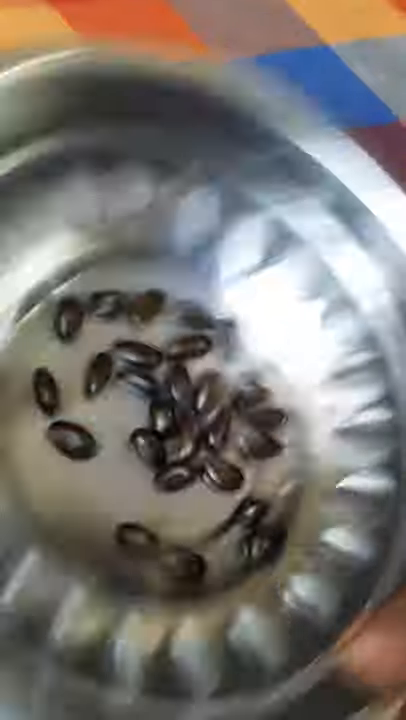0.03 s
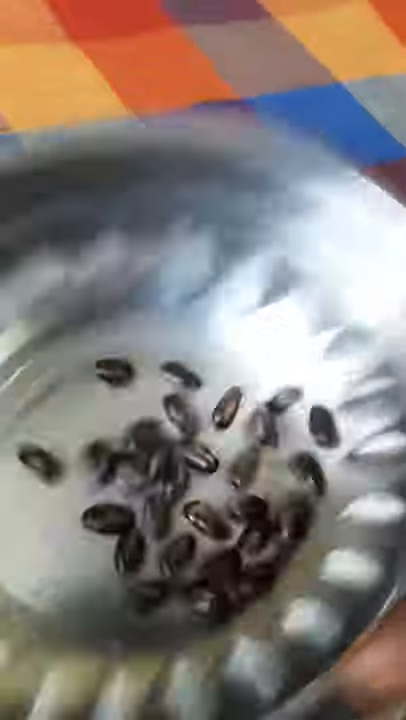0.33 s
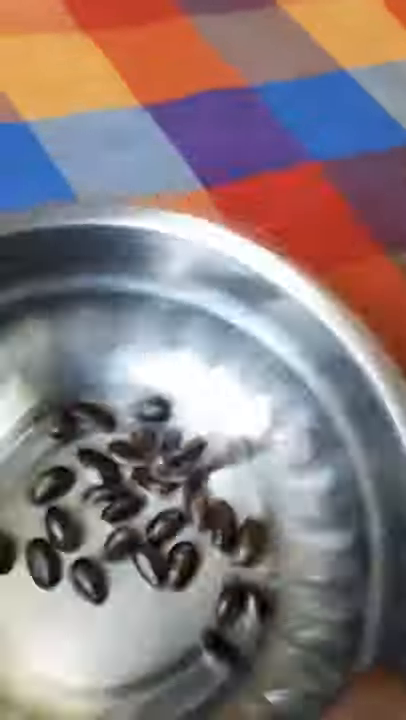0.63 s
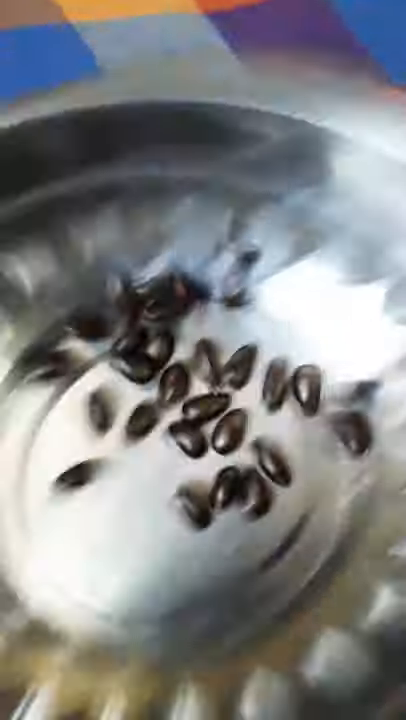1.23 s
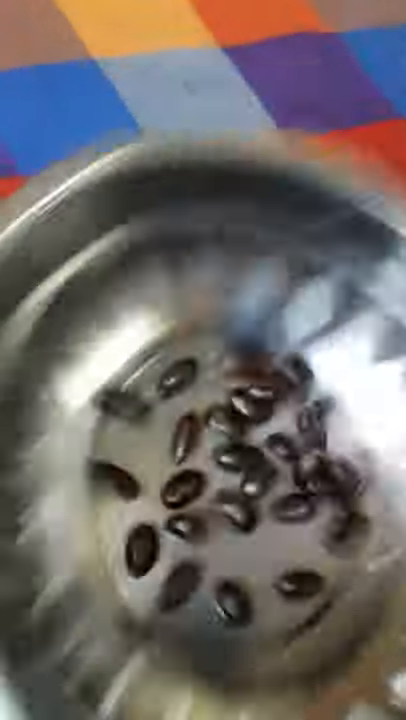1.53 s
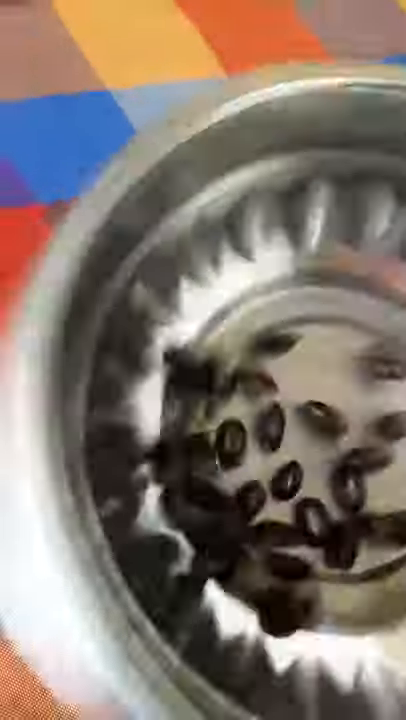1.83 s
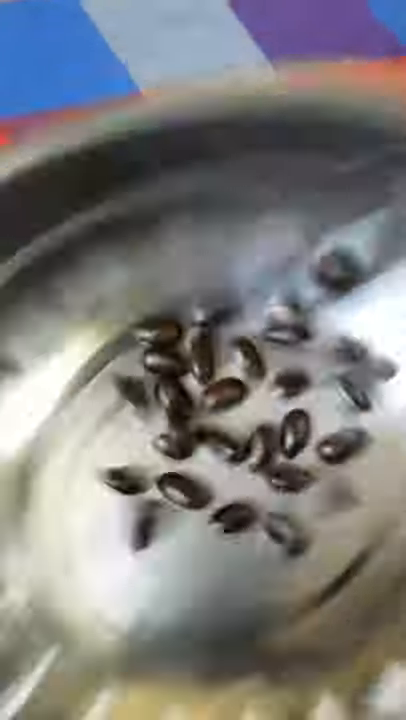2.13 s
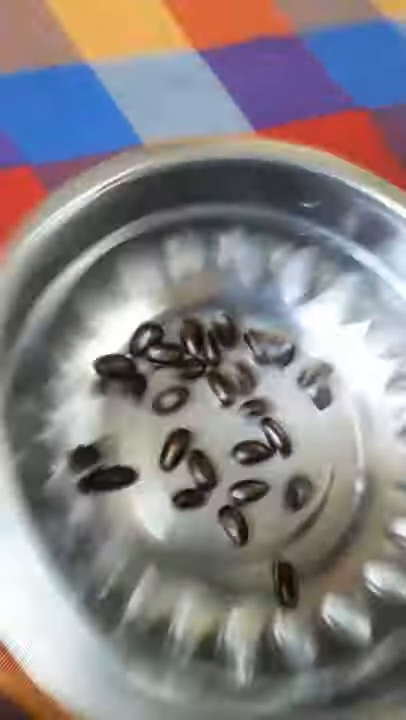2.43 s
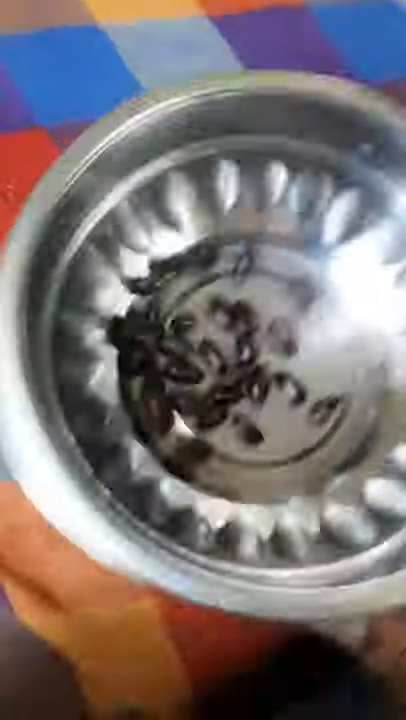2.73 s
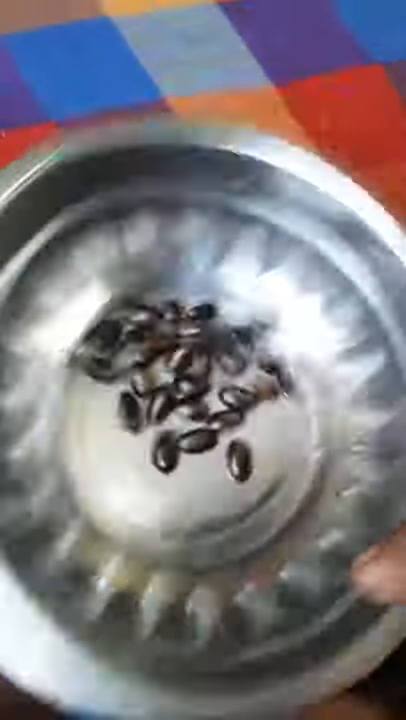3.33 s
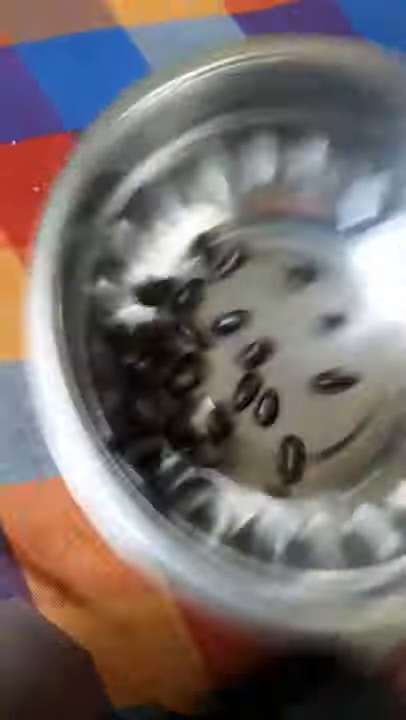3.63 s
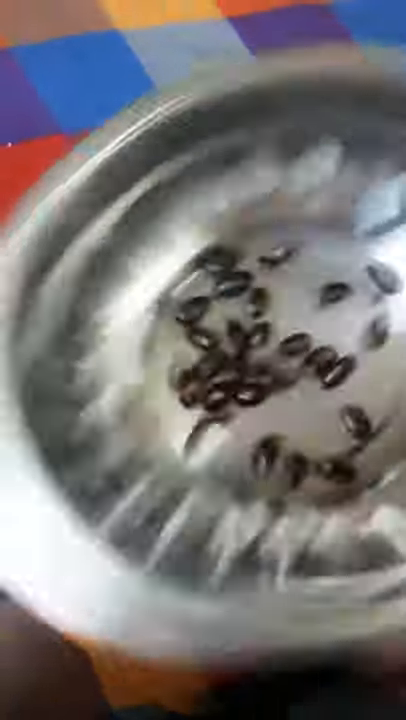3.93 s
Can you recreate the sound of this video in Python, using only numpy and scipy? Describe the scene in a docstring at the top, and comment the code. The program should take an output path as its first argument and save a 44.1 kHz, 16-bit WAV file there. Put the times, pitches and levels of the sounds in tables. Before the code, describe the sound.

Seeds swirl and clatter in a thin metal bowl with bright, ringing pings.

```python
"""A thin steel bowl rings as a few dozen hard seeds are shaken round it, heard from close by.
The seeds slide and skitter over the bottom and surge against the fluted wall. Each impact excites the
bowl's normal modes, in a mix that depends on the spot struck, over a short clatter and a crack.
Single hard hits ping out of the rattle, and a faint low hum comes and goes near the end."""
import sys
import numpy as np
from scipy import signal
from scipy.fft import rfft, irfft, next_fast_len
from scipy.io import wavfile
from scipy.ndimage import uniform_filter1d

SR = 44100
rng = np.random.default_rng(int(sys.argv[2]) if len(sys.argv) > 2 else 0)


def inscribe(sig):
    """Save sig as 16-bit PCM at rate SR to the path in sys.argv[1].

    A 1-D sig is mono; a 2-D sig holds one channel per row.
    Samples are clipped to [-1, 1] before scaling.
    """
    pcm = np.round(np.clip(np.atleast_2d(sig).T, -1, 1) * 32767)
    wavfile.write(sys.argv[1], SR, pcm.astype(np.int16))


N = 176400

# Normal modes of the bowl: frequency_hz, energy_share_db
BOWL_MODES = [(1620, -32.6), (2385, -19.3), (2515, -23.2), (2672, -24.7), (2755, -27.5), (3211, -15.8),
              (3250, -19.5), (3428, -16), (3452, -18), (3617, -26), (3895, -27.1), (4170, -19.7),
              (4252, -14.4), (4315, -14.1), (4405, -16), (4670, -22.0), (4811, -16), (5048, -22.5),
              (5238, -19.6), (5367, -22.5), (5712, -21), (6130, -19.2), (6392, -15.8), (6503, -20.1),
              (6678, -19.9), (6800, -21.8), (7046, -18.0), (7100, -17.2), (7185, -19.1), (7410, -20.7),
              (7500, -18.4), (7590, -14), (7688, -12.5), (8292, -16.2), (8400, -16.6), (8740, -22.4),
              (9157, -21.5), (9430, -18.5), (10444, -26.3), (10780, -24.5), (11466, -18.0), (12110, -21.3),
              (12700, -24), (13500, -21.7), (14690, -27.9), (15420, -28.6)]
# Spectrum of the seeds' clatter and the many weak modes: frequency_hz, relative_density_db
CLATTER_SPECTRUM = [(90, -67.5), (165, -63.5), (225, -57.5), (305, -59), (360, -61.5), (560, -63),
                    (640, -47), (1020, -47), (1130, -53.5), (1520, -54.5), (1900, -44.5), (2150, -51.5),
                    (2550, -39.5), (2950, -57), (3350, -40.5), (3780, -50), (4200, -37), (4750, -40),
                    (5020, -59), (5950, -46), (6400, -38.5), (7600, -33), (8500, -46.5), (9450, -45),
                    (9900, -56), (10700, -53), (13300, -52), (13900, -63), (15700, -47.5)]
# Seeds skittering on the bottom: time_s, level_db, gain_below_5500_hz_db, gain_above_9050_hz_db
SKITTER_LEVELS = [(0.07, -25.5, 9.5, 4), (0.14, -20, -0.5, -7), (0.3, -22.5, 4, 1.8), (0.45, -19, 3, -2),
                  (0.72, -20.5, 3, -0.5), (0.78, -22.5, 3.5, -2.5), (0.9, -18, 2, -2.5),
                  (1.1, -19.5, 2, 5.5), (1.2, -18.5, 3.5, 3.5), (1.31, -17, 0.5, 5.5),
                  (1.4, -15, -1.5, -17), (1.46, -16.5, 2, -9.5), (1.62, -13.5, -1.9, -7),
                  (1.77, -19.5, -1, 5), (1.89, -23.5, -0.5, -2.5), (2.0, -19.5, 1, 3), (2.12, -23, 1.5, 0),
                  (2.25, -19.5, -0.5, 3), (2.45, -22.5, -0.5, -4), (2.55, -23, -1, -1.3),
                  (2.68, -21, -0.5, 2.5), (2.77, -24.5, -1.1, -7), (2.9, -22, -2.5, -1.5),
                  (3.15, -20, 1.1, -0.5), (3.26, -21.5, -0.5, -1), (3.49, -18, -1.5, -2),
                  (3.64, -12.5, -2, -2), (3.705, -18.5, -1.5, -3), (3.8, -13.7, -1, 3.5),
                  (4.0, -16.5, -3, -4)]
# Two bright groups of modes against their neighbours: time_s, gain_3000_3750_hz_db, gain_3750_5500_hz_db
MODE_GROUP_GAINS = [(.1, 0.5, -2), (.3, 1, 0), (.75, 4, -2.5), (.88, 2.5, -0.5), (1.3, -0.5, .5),
                    (1.53, -1.5, 2), (1.85, -5, -0.5), (2.18, 1.5, .5), (2.31, -3.5, 3), (2.5, -4, -1.5),
                    (3.1, -4, -1), (3.56, -4.5, -2), (3.8, -2, -4), (3.95, -3, 0.5)]
# Bunches of seeds running into the wall: start_s, rise_s, level_db, extra_treble_db
WALL_SURGES = [(0.152, 0.022, -15.5, 6.5), (0.19, 0.01, -14.5, -6), (0.24, 0.023, -15, -0.5),
               (0.362, 0.0091, -20.5, 5.5), (0.477, 0.0019, -16, -4), (0.508, 0.0055, -15, -1),
               (0.597, 0.003, -15.5, 5.5), (0.629, 0.007, -16.5, 0), (0.703, 0.0093, -14.5, 1.5),
               (0.818, 0.0083, -14, 7), (0.839, 0.0076, -11.5, 3), (0.9, 0.015, -15, -5),
               (0.953, 0.0059, -14, 5), (1.037, 0.015, -18.5, 2.5), (1.121, 0.014, -15.5, 3),
               (1.251, 0.0066, -12, 1), (1.326, 0.025, -11.5, 9.5), (1.468, 0.014, -11.5, 8),
               (1.509, 0.017, -13.5, 6), (1.574, 0.0098, -13.5, 2), (1.611, 0.0066, -15.5, 9),
               (1.68, 0.013, -12.5, 1), (1.695, 0.007, -13, 3.5), (1.733, 0.0032, -11, 2.5),
               (1.792, 0.011, -15.5, 2.5), (1.915, 0.016, -14.5, 2), (2.039, 0.0055, -14.5, -8),
               (2.073, 0.0015, -16, 1), (2.153, 0.014, -18, 6), (2.282, 0.005, -16, 2),
               (2.309, 0.0057, -15.5, 4), (2.39, 0.023, -18, 5.5), (2.58, 0.015, -20, -3),
               (2.785, 0.015, -22.5, 6), (2.843, 0.012, -17.5, 5), (2.924, 0.012, -17.5, -7),
               (2.973, 0.0069, -19.5, 3), (3.066, 0.015, -16.5, 1), (3.183, 0.0093, -15.5, -1),
               (3.264, 0.03, -15.5, -2), (3.389, 0.0023, -11, 8), (3.423, 0.0039, -10.5, 1),
               (3.512, 0.012, -16.5, -4), (3.552, 0.0064, -11.5, 4.5), (3.752, 0.0075, -10, -1),
               (3.865, 0.011, -12, -11), (3.974, 0.02, -11.5, 3)]
# Single hard hits, each favouring one group of modes: start_s, level_db, centre_hz, bandwidth_hz
HARD_HITS = [(.0703, -18, 6000, 6000), (.683, -14, 3420, 300), (1.176, -16, 4750, 600),
             (1.288, -21, 11500, 4000), (1.338, -19, 12000, 2400), (1.399, -13, 4650, 450),
             (1.58, -12, 7000, 3000), (1.86, -22, 4650, 450), (2.796, -24, 4400, 300),
             (3.036, -15.5, 7500, 5000), (3.556, -12, 7000, 1600), (3.651, -16, 4450, 500),
             (3.725, -14, 9000, 4500)]

START_S, RATTLE_DB = .069, 1
RING_DB, CLATTER_DB, CRACK_DB = -1.3, -5.5, -9
RING_T60_S, RING_T60_SLOPE = 0.16, 0.45  # ring time at 3 kHz; higher modes die sooner
CLATTER_T60_S, CRACK_T60_S = .08, .011
RADIATES_ABOVE_HZ = 470  # the small bowl gives off little bass
SPOT_SPREAD_DB = 6.5  # scatter of a mode's strength from spot to spot
CLUSTER_HZ = 41.3  # scatter of tuning at 10 kHz; the high modes come in close groups
IMPACTS_PER_S, IMPACT_SPREAD_DB, SHARING_S = 620, 6.5, .018
BOUNCE_S, BOUNCE_KEEP = .0009, 0.76  # a tumbling seed touches again at once, more weakly
SLIDE_SHARE, SLIDE_SMOOTH_S = .45, .05  # sliding's share of the lowest register's power; its smoothing
REGISTER_EDGES_HZ = (1150, 3000, 3750, 5500, 9050)
ROAM_SPOTS_PER_S, HEAP_SPOTS = 16, 2.2  # the heap travels round the bowl and covers a few spots
PING_S = .012  # a ping has the energy of its level held this long
PING_CRACK_DB, PING_CRACK_T60_S = -6, .014
PING_BOUNCE_CYCLES = 2.4  # gap times bandwidth: square hits are broad and sharp, glancing ones drawn out
HUM_HZ, HUM_DB, HUM_FROM_S, HUM_TO_S = 124, -61, 3.0, 3.75
LOW_CUT_HZ, TOP_HZ = 85, 15620


def undb(db):
    """Decibels as an amplitude ratio."""
    return 10 ** (np.asarray(db) / 20)


def unit_energy(x):
    """Normalisation to an energy of 1."""
    return x / np.sqrt(np.sum(x ** 2))


def decay(t, t60):
    """Exponential damping, 60 dB down after t60."""
    return np.exp(-np.log(1000) * t / t60)


def clatter(t, t60):
    """Modal overlap: many weak modes merge into damped noise; minimum phase keeps its onset sharp."""
    hz, db = np.array(CLATTER_SPECTRUM).T
    f = np.fft.rfftfreq(len(t), 1 / SR)
    magnitude = undb(np.interp(np.log(f + 1), np.log(hz), db))
    cepstrum = irfft(np.log(magnitude), len(t))
    colour = np.exp(rfft(2 * cepstrum * (t > 0) * (t < t[-1] / 2)))
    noise = rng.standard_normal(len(t)) * decay(t, t60)
    return unit_energy(irfft(rfft(noise) * colour, len(t)))


def bowl_responses(count, size):
    """Modal superposition: each spot struck gives its own mix of damped sines, plus clatter and crack."""
    t = np.arange(size) / SR
    hz, db = np.array(BOWL_MODES).T
    ring_times = RING_T60_S * (3000 / hz) ** RING_T60_SLOPE
    envelopes = np.array([np.sqrt(2) * unit_energy(decay(t, t60)) for t60 in ring_times])
    signs = rng.choice([-1, 1], (count, len(hz)))
    shapes = signs * undb(SPOT_SPREAD_DB * rng.standard_normal(signs.shape))
    gains = undb(db) * shapes / np.sqrt(np.mean(shapes ** 2, axis=0))
    tunings = hz + CLUSTER_HZ * (hz / 10000) ** 2 * rng.standard_normal(gains.shape)
    rings = [gain @ (envelopes * np.sin(np.float32(2 * np.pi * f[:, None] * t)))
             for gain, f in zip(gains, tunings)]
    radiation = signal.butter(6, RADIATES_ABOVE_HZ, "high", fs=SR, output="sos")
    return [undb(RING_DB) * ring
            + undb(CLATTER_DB) * clatter(t, CLATTER_T60_S)
            + undb(CRACK_DB) * clatter(t, CRACK_T60_S) for ring in signal.sosfilt(radiation, rings)]


def seed_impacts(touches=3):
    """A Poisson process of unequal impacts, each a quick run of inelastic bounces."""
    at = np.flatnonzero(rng.random(N) < IMPACTS_PER_S / SR)
    strength = undb(IMPACT_SPREAD_DB * rng.standard_normal(len(at)))
    ticks = np.zeros(N)
    for k in range(touches):
        ticks[at % N] += strength * BOUNCE_KEEP ** k
        at = at + (BOUNCE_S * SR * rng.exponential(1, len(at))).astype(int)
    # impacts close together share the heap's momentum
    width = int(SHARING_S * SR / 2) + 1
    local_power = uniform_filter1d(uniform_filter1d(ticks ** 2, width), width)
    return ticks / np.sqrt(np.abs(local_power) + 1e-6)


def seed_forces():
    """Incoherent addition: skitter and surges sum in power to drive six registers, listed low to high."""
    t = np.arange(N) / SR
    times, *columns = np.array(SKITTER_LEVELS).T
    skitter, low, treble = (undb(np.interp(t, times, db)) for db in columns)
    times, *columns = np.array(MODE_GROUP_GAINS).T
    lower_group, upper_group = (undb(np.interp(t, times, db)) for db in columns)
    power, treble_power = skitter ** 2, skitter ** 2
    for start_s, rise_s, level_db, extra_treble_db in WALL_SURGES:
        age = np.clip((t - start_s) / max(rise_s, .002), 0, 20)
        surge = undb(level_db) * age * np.exp(1 - age)
        power += surge ** 2
        treble_power += (surge * undb(extra_treble_db)) ** 2
    ticks = seed_impacts()
    taps = ticks * np.sqrt(power)
    # sliding friction drives the lowest register steadily between the impacts
    sliding = np.sqrt(SLIDE_SHARE) * rng.standard_normal(N)
    slow_power = uniform_filter1d(power, int(SLIDE_SMOOTH_S * SR))
    body = (sliding + np.sqrt(1 - SLIDE_SHARE) * ticks) * np.sqrt(slow_power)
    return np.array([low * body, low * taps, low * lower_group * taps, low * upper_group * taps,
                     taps, treble * ticks * np.sqrt(treble_power)]) * (t > START_S)


def seed_rattle(responses):
    """Convolution: each force rings the bowl with the response of a spot under the travelling heap."""
    forces = seed_forces()
    heap_centre = ROAM_SPOTS_PER_S * np.arange(N) / SR
    struck_spot = np.floor(heap_centre + HEAP_SPOTS * rng.standard_normal(N)) % len(responses)
    size = next_fast_len(N + len(responses[0]))
    f = np.fft.rfftfreq(size, 1 / SR)
    lowpasses = [1 / (1 + (f / edge) ** 30) for edge in REGISTER_EDGES_HZ]
    registers = np.diff(lowpasses, axis=0, prepend=0, append=1)
    spectrum = 0
    for spot, response in enumerate(responses):
        drive = np.sum(rfft(forces * (struck_spot == spot), size) * registers, axis=0)
        spectrum += drive * rfft(response, size)
    return irfft(spectrum, size)[:N]


def wall_pings(responses, touches=4):
    """Resonance: one fast seed strikes the wall, bounces a few times, and a group of modes flares."""
    size = len(responses[0])
    t = np.arange(size) / SR
    out = np.zeros(N + 2 * size)
    for k, (start_s, level_db, centre_hz, bandwidth_hz) in enumerate(HARD_HITS):
        hit = responses[k % len(responses)] + undb(PING_CRACK_DB) * clatter(t, PING_CRACK_T60_S)
        gaps = PING_BOUNCE_CYCLES / bandwidth_hz * SR * rng.uniform(.5, 1.5, touches)
        delays = (np.cumsum(gaps) - gaps[0]).astype(int)
        bounces = np.bincount(delays, BOUNCE_KEEP ** np.arange(touches))
        resonance = signal.iirpeak(centre_hz, centre_hz / bandwidth_hz, fs=SR)
        ring = signal.lfilter(*resonance, signal.fftconvolve(hit, bounces))
        i = int(start_s * SR)
        out[i:i + len(ring)] += undb(level_db) * np.sqrt(PING_S * SR) * unit_energy(ring)
    return out[:N]


def hum():
    """Amplitude modulation: a faint low sine tone swells and fades once."""
    t = np.arange(N) / SR
    progress = np.clip((t - HUM_FROM_S) / (HUM_TO_S - HUM_FROM_S), 0, 1)
    swell = np.sqrt(np.abs(np.sin(np.pi * progress)))
    return undb(HUM_DB) * np.sqrt(2) * swell * np.sin(2 * np.pi * HUM_HZ * t)


def scene():
    """Linear superposition: rattle and pings ring the same bowl and add to the hum in one channel."""
    responses = bowl_responses(count=16, size=8192)
    return (undb(RATTLE_DB) * seed_rattle(responses) + wall_pings(responses) + hum())[None]


def record(dry):
    """Band limiting and saturation: the bass is thinned, peaks stop at full scale, the top is cut."""
    low_cut = signal.butter(2, LOW_CUT_HZ, "high", fs=SR, output="sos")
    top_cut = signal.ellip(12, .1, 80, TOP_HZ, fs=SR, output="sos")
    limited = np.clip(signal.sosfilt(low_cut, dry), -1, 1)
    return signal.sosfilt(top_cut, limited)


dry = scene()
out = record(dry)
inscribe(out)
```